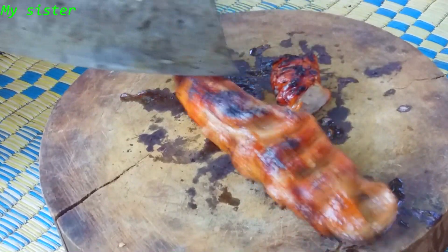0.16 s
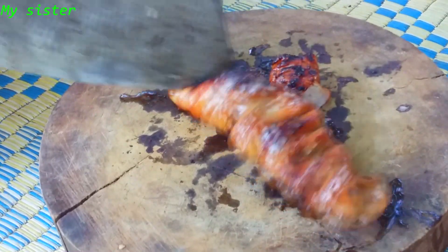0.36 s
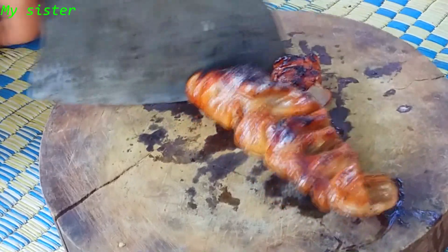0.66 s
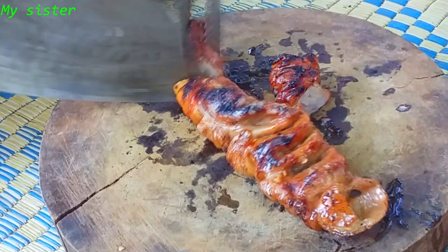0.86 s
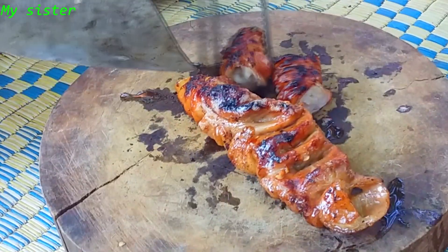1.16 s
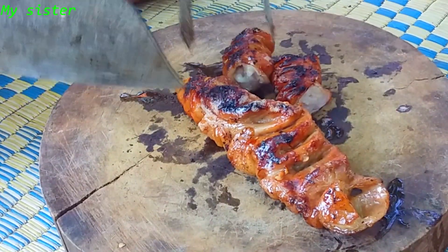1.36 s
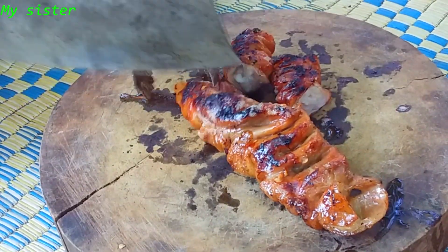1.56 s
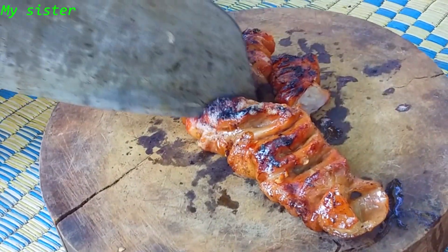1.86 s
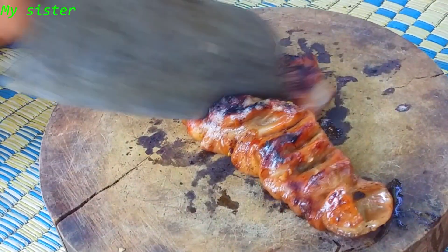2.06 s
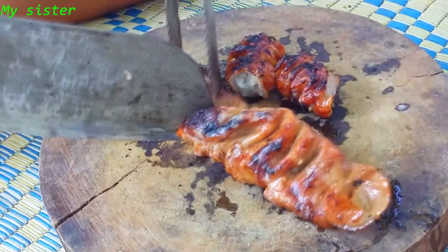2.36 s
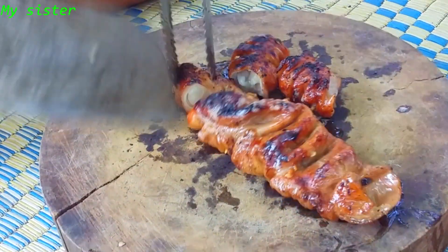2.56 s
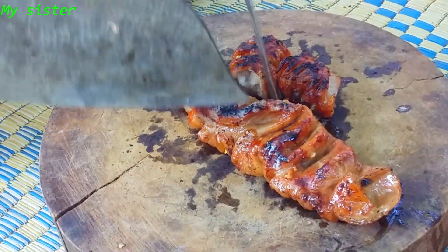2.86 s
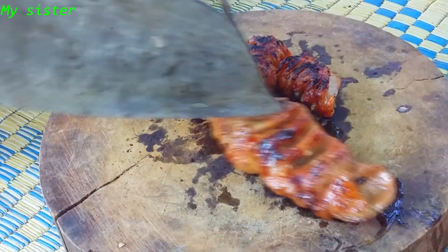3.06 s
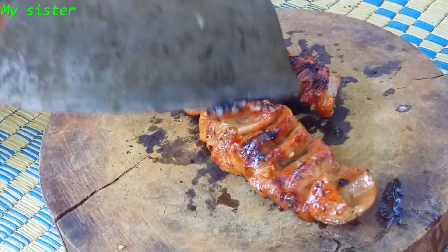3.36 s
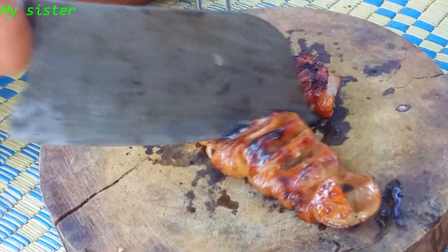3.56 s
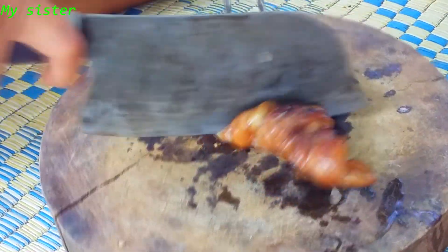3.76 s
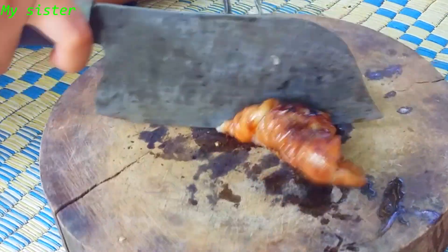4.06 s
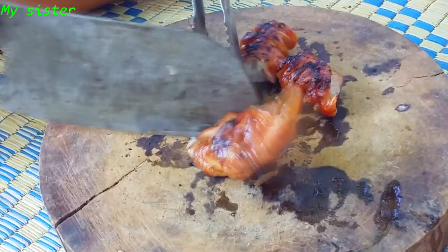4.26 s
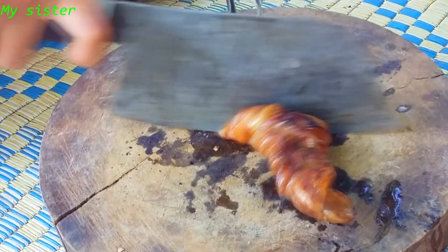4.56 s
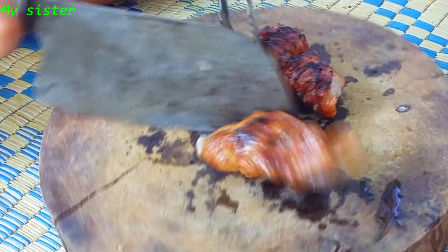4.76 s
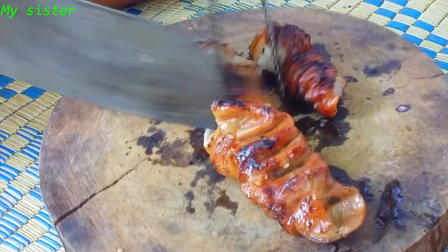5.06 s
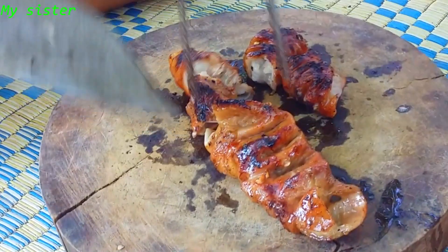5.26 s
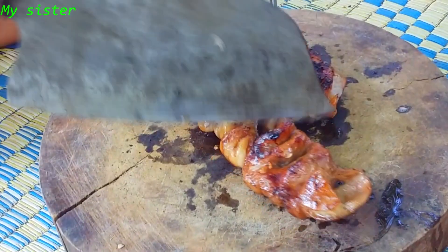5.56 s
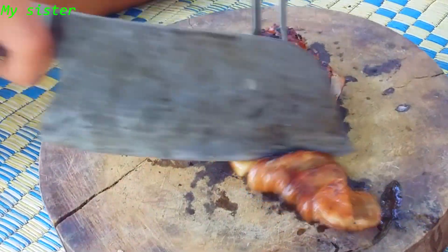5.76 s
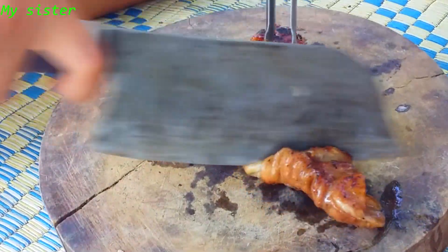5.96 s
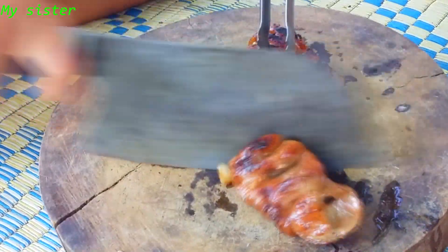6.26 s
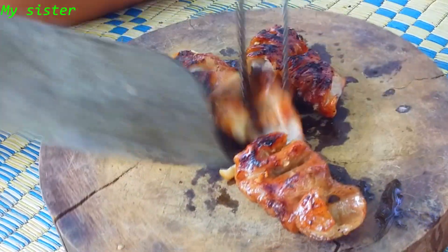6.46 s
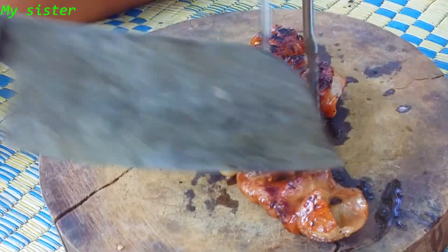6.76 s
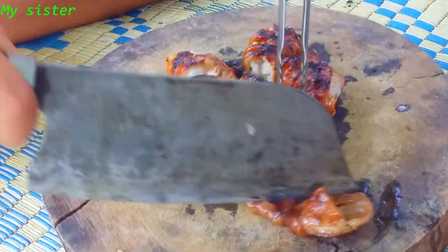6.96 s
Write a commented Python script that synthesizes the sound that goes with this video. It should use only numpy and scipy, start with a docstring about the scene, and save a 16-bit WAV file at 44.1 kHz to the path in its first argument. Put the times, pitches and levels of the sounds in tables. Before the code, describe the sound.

Very close to the microphone, a steel cleaver works through crusty grilled pork on a thick wooden block. Quiet scrapes and a soft wooden knock come first, then a pause, a light tong clink and small crackles. Sharp crust cracks lead into rapid rough sawing strokes with ringing blade edge, and finally a much louder harsh scraping burst. Low rumble and faint hiss lie beneath, with very little reverberation.

```python
"""Cleaver sawing grilled pork

A steel cleaver saws through grilled pork on a thick wooden block, close to one microphone. Slip jolts, shaped
by stroke forces, shake resonances of blade, edge and block and add unringing rasp. Crust snaps are short cracks
among splinter noise; tong clinks and block knocks are dying sines. Filtered noise gives a quiet rumble and
hiss, with a wavering band near 5 kHz. Both channels are the same."""
import sys
import numpy as np
from scipy import signal
from scipy.fft import rfft, irfft
from scipy.io import wavfile
from scipy.ndimage import uniform_filter1d

SR = 44100
rng = np.random.default_rng(int(sys.argv[2]) if len(sys.argv) > 2 else 0)


def file_out(sig):
    """Save sig as 16-bit WAV at sys.argv[1]."""
    # one column per channel
    cols = np.atleast_2d(sig).T
    # limit, then scale
    lim = np.clip(cols, -1, 1)
    pcm = np.round(lim * 32767).astype(np.int16)
    wavfile.write(sys.argv[1], SR, pcm)


N = 314433

# saw strokes: (full force at [s], rise [s], hold [s], release [s], blade drive [dB],
# then above the blade drive: edge [dB], block low modes [dB], block high modes [dB];
# modes favoured by the contact point: blade [Hz], edge [Hz])
SAW_STROKES = [ (0.142, 0.035, .002, 0.025, -77.5, 23, -7, -6, 2500, 5550),
               (0.179, 0.033, .1, 0.051, -74.5, 12, 8, 4, 2400, 5350),
               (0.432, .025, 0.14, .03, -79.5, 19, 8, -5, 2500, 5120),
               (0.591, 0.045, 0.023, .05, -66.5, 13, 0, -7, 2620, 5450),
               (0.641, 0.031, .002, 0.03, -59, 8, 1.5, -5, 2540, 5450),
               (0.774, 0.1, .18, .06, -71, 12, 8.5, -3, 2300, 5330),
               (2.161, 0.058, .002, 0.079, -61.5, 10, 2, -12, 2970, 4500),
               (2.303, 0.078, 0.036, .12, -65, 11.5, 1, -5, 2600, 5000),
               (2.476, .03, .002, .04, -79, 21, -3, -5, 2480, 5150),
               (2.53, 0.055, 0.085, .08, -77, 13, 9, 3, 2480, 5130),
               (2.715, 0.028, 0.1, 0.11, -70.5, 3, 0, -4, 2320, 4860),
               (3.401, 0.011, 0.02, 0.019, -63, 2.5, -6, 5, 2470, 4800),
               (3.513, .02, 0.034, 0.2, -70, -18, 0, 3.5, 2540, 4920),
               (3.663, 0.051, .015, .02, -72.5, 12, -2, 5, 2500, 5400),
               (3.701, 0.015, 0.017, 0.026, -43.5, 12.5, -36, -40, 3030, 4350),
               (3.744, 0.044, 0.026, 0.057, -47, 1.5, -10.5, -4, 2400, 4900),
               (3.852, 0.0062, .002, 0.023, -45, 2.5, -32, -34, 3020, 3900),
               (3.909, 0.05, .002, 0.016, -44, -3.5, -11, -0.5, 2400, 4730),
               (3.944, 0.02, .036, 0.031, -61, 5, -4, 0.5, 2370, 5000),
               (4.052, 0.028, 0.065, 0.033, -57, 2, -8, -1, 2340, 5000),
               (4.19, 0.016, 0.011, 0.039, -44, -7.5, -7.5, -1, 2320, 3970),
               (4.229, .02, 0.035, 0.022, -52, 0.5, -0.5, -5, 2200, 5400),
               (4.302, 0.024, 0.041, .03, -71, 3, -18, -11, 2270, 4880),
               (4.426, 0.018, .002, 0.043, -44, -5, -22, -4, 2330, 5000),
               (4.552, 0.2, .002, 0.029, -50.5, -1.5, -3, -3.5, 2320, 5420),
               (4.606, 0.017, .002, 0.24, -59, 0, 0.5, 2.5, 2390, 5100),
               (4.747, 0.018, 0.044, .04, -70, 14, 8.5, 2, 3040, 4920),
               (4.893, 0.036, .002, 0.042, -67, 20.5, 9, 4, 2440, 4760),
               (4.908, .02, 0.043, 0.02, -68, 10.5, 5.5, 4, 2450, 4300),
               (5.065, 0.06, 0.059, 0.074, -59, 6.5, 1, -13, 2370, 5050),
               (5.684, 0.007, .002, 0.053, -51, 13, -21, -6, 2460, 4600),
               (5.801, 0.074, .002, 0.061, -53, -2, -11, -6, 2540, 3850),
               (5.887, .01, 0.1, .03, -69, 4.5, 0, 3, 2260, 4900),
               (6.055, 0.031, 0.022, 0.03, -36, -4, -11.5, -6, 2440, 3880),
               (6.098, 0.014, 0.02, 0.018, -31, 1.5, -17, -12, 2370, 5800),
               (6.13, 0.033, 0.017, 0.045, -27.5, -1, -42, -1, 2840, 3900),
               (6.211, 0.067, .002, 0.042, -55, 9, 10, -3, 2200, 4560),
               (6.256, .008, .012, 0.033, -49.5, 5, -10, -9, 2570, 4430),
               (6.29, 0.035, 0.0023, 0.046, -34.5, 4.5, -13, -4, 2600, 4460),
               (6.314, 0.044, 0.0024, 0.024, -27, -4, -38, -17, 2640, 4370),
               (6.364, 0.098, 0.033, .06, -59, 9.5, 7, -12, 2080, 3920),
               (6.437, 0.098, 0.012, 0.1, -56.5, 8.5, 3.5, -11, 1990, 5100),
               (7.09, 0.0045, 0.011, .008, -52.5, 3.5, -21, -15, 2540, 4240), ]
# crust snaps: (time [s], level [dB], centre [Hz], block high-mode jolt above level [dB])
CRUST_SNAPS = [(0.1316, -50, 5600, -32), (0.19, -47, 5400, -20), (0.4339, -47, 5170, -31),
               (0.4918, -50, 5540, -16), (0.592, -39.5, 5070, -29), (0.643, -59, 5500, -28),
               (1.919, -53, 3720, -25), (1.927, -46.5, 5150, -34), (2.057, -50.5, 5270, -5),
               (2.064, -42, 4260, -27), (2.1634, -33, 4280, -16), (2.291, -44, 4200, -25),
               (2.3688, -52, 5070, -10), (3.3033, -49, 2420, 3.5), (3.6351, -50, 4900, -9),
               (3.6875, -44, 5800, -30), (3.702, -24, 4320, -27), (3.7185, -23, 4570, -26),
               (3.8525, -39, 3000, -27), (3.9014, -36.5, 2530, -1), (4.2064, -35.5, 2360, -25),
               (4.397, -51, 5270, -30), (4.4379, -41.5, 5160, -29), (4.559, -43.5, 5500, -9),
               (4.6049, -54.5, 1170, -19), (4.686, -52.5, 1360, -18), (4.785, -40.5, 5230, -35),
               (4.891, -33, 4900, -36), (5.685, -30, 5400, -40), (5.8074, -53, 2920, -19),
               (5.839, -48, 5200, -25), (5.8885, -47, 2400, -16), (6.2582, -50, 5270, -23),
               (6.2696, -56, 2540, -16), (6.9602, -44, 4000, -23), (6.9665, -43.5, 4500, -31),
               (7.0985, -43.5, 2620, -26)]
# knocks on the block: (time [s], level [dB])
BLOCK_KNOCKS = [(0.06, -45), (1.184, -43.5)]
# blade struck in the air: (frequency [Hz], relative level [dB], t60 [s])
FREE_BLADE_MODES = [(1480, -16, .08), (2056, -6, .08), (2525, -6, .16), (2875, -12, .07), (3900, -7, .09),
                    (4240, -6, .05), (5000, -2, .05), (5340, 0, .05), (5780, -1, .05), (6940, -7, .04),
                    (10790, 0, .045)]
# block when knocked: (frequency [Hz], relative level [dB], t60 before the fade [s])
KNOCKED_BLOCK_MODES = [(754, 7, 0.19), (850, -2, 0.089), (1790, -6, .07), (1887, 1.5, 0.055)]
# blade under the hand: (frequency [Hz], width [Hz], relative level [dB])
BLADE_MODES = [(1740, 380, -10), (2100, 120, -6), (2356, 220, -1.5), (2590, 110, -7.5), (2697, 220, 4.5),
               (2988, 210, 5), (3050, 300, 3.5)]
# thin edge under the hand: (frequency [Hz], width [Hz], relative level [dB])
EDGE_MODES = [(3535, 110, -12), (3380, 150, -7), (3770, 300, 12.5), (4200, 97, -14), (4140, 370, 13.5),
              (5000, 290, -27), (4680, 470, 15.5), (5270, 460, -19), (5143, 140, 13), (5414, 250, 12),
              (5700, 27, -10), (5800, 140, -16.5), (6580, 540, 3.5)]
# block while sawing, low: (frequency [Hz], width [Hz], relative level [dB])
BLOCK_LOW_MODES = [(739, 128, -5.5), (897, 175, -7), (1830, 1270, -6.5)]
# block while sawing, high: (frequency [Hz], width [Hz], relative level [dB])
BLOCK_HIGH_MODES = [(1011, 40, 4), (1116.5, 126, 17), (2246, 300, 4)]
# spectrum of the unringing part of the slips: (frequency [Hz], relative density [dB per Hz])
RASP_SPECTRUM = [(120, -52), (200, -38.5), (589, -12), (1130, -4), (1390, -0.5), (2660, -3), (3260, -2),
                 (5840, -11), (12000, -67), (15600, -83), (22000, -120)]
# spectrum of the surroundings: (frequency [Hz], relative density [dB per Hz])
AIR_SPECTRUM = [(12, -49), (20, -22), (26, -33), (55, -2.5), (93, -2), (122, -1), (253, -3), (406, -9),
                (454, -8), (887, -14), (1240, -14), (2630, -19), (5000, -18), (7590, -37), (15700, -31)]
# level following of blade, edge, block low, block high: (each [dB per dB of force]); the block follows the
# force less steeply
FORCE_FOLLOW = [1.008, 0.99, 0.85, 0.85]
# level change during the hold, as the edge sinks into the meat and dulls:
# (blade [dB/s], edge [dB/s], block low [dB/s], block high [dB/s])
HOLD_SLOPES = [10, -49, -5, -5]
# tongs touching the blade: (time [s], level [dB])
TONG_CLINKS = [(1.7398, -36.5), (5.684, -38)]

AIR_DB, HISS_BAND_DB = -67.5, -74
BAND_LIMIT_HZ = 15750
RAMP_DB = 25  # force gained in one rise time, lost in one release time


def gain_of(db):
    """dB to gain."""
    return 10 ** (np.asarray(db) / 20)


def evened(x):
    """Scales to rms 1."""
    return x / np.sqrt(np.mean(x ** 2) + 1e-20)


def coloured(x, spectrum):
    """Shapes x by (Hz, dB) points on a log-frequency axis, keeping the power of white input."""
    point_hz, point_db = np.transpose(spectrum)
    hz = np.fft.rfftfreq(len(x), 1 / SR)
    shape_db = np.interp(np.log(hz + 1), np.log(point_hz + 1), point_db)
    return irfft(rfft(x) * evened(gain_of(shape_db)), len(x))


def resonate(x, hz, width_hz):
    """One mode with steep skirts: two peaks in series; white input of rms 1 leaves near rms 1."""
    widths_hz = (width_hz, min(2.6 * width_hz, hz))
    stages = [np.concatenate(signal.iirpeak(hz, hz / w, SR)) for w in widths_hz]
    return signal.sosfilt(stages, x) / np.sqrt(np.pi * width_hz / SR)


def drift(rate_hz):
    """Slow random curve of rms 1: averaged random steps, interpolated."""
    steps_per_s = 60
    steps = rng.standard_normal(round(N / SR * steps_per_s) + 2)
    steps = evened(uniform_filter1d(steps, max(1, round(steps_per_s / rate_hz))))
    return np.interp(np.arange(N), np.linspace(0, N, len(steps)), steps)


def add(mix, start_s, sound):
    """Mixes a sound in place from start_s, cut at the end of the mix."""
    part = mix[round(start_s * SR):][:len(sound)]
    part += sound[:len(part)]


def ring(modes, rise_s):
    """Exponentially dying sines with a soft start, peak 1."""
    t = np.arange(SR // 4) / SR
    hz, level_db, t60_s = np.transpose(modes)[:, :, None]
    sines = gain_of(level_db - 60 * t / t60_s) * np.sin(2 * np.pi * hz * t)
    sound = sines.sum(0) * (1 - np.exp(-t / rise_s))
    return sound / abs(sound).max()


def background():
    """Rumble and hiss: slightly swelling coloured noise plus a wavering band near 5 kHz."""
    air_gain = gain_of(AIR_DB + 0.13 * drift(3.))
    air = air_gain * coloured(rng.standard_normal(N), AIR_SPECTRUM)
    waver_db = 1.2 * drift(3.) + 1.8 * drift(30.)
    hiss_band = resonate(rng.standard_normal(N), 5180, 760)
    return air + gain_of(HISS_BAND_DB + waver_db) * hiss_band


def knocks():
    """Knocked block: soft-started modes, dull, held about 12 ms then faded out fast."""
    out, t = np.zeros(N), np.arange(1400) / SR
    for time_s, level_db in BLOCK_KNOCKS:
        fade = np.exp(-(t / 0.012) ** 4)
        add(out, time_s, gain_of(level_db) * ring(KNOCKED_BLOCK_MODES, .001)[:len(t)] * fade)
    return out


def stroke_force():
    """Strokes rise, hold and let go; the strongest at a moment dominates the favoured modes."""
    force, contact = np.zeros((4, N)), np.zeros((2, N))
    for full_s, rise_s, hold_s, release_s, blade_db, *above_db, blade_hz, edge_hz in SAW_STROKES:
        rise_s, hold_s, release_s = max(rise_s, .003), max(hold_s, 0), max(release_s, .003)
        t = np.arange(-2 * rise_s, hold_s + 2 * release_s, 1 / SR)
        start_s = full_s + t[0]
        held_s = np.clip(t, 0, hold_s)
        ramp_db = RAMP_DB * np.minimum(np.minimum(t / rise_s, (hold_s - t) / release_s), 0)
        for line, db, follow, slope in zip(force, [0, *above_db], FORCE_FOLLOW, HOLD_SLOPES):
            add(line, start_s, gain_of(blade_db + db + follow * ramp_db + slope * held_s))
        weight = gain_of(blade_db + ramp_db + HOLD_SLOPES[0] * held_s)
        for line, hz in zip(contact, (blade_hz, edge_hz)):
            add(line, start_s, hz * weight)
    # force-weighted mean of the favoured modes, with defaults at rest
    rest = gain_of(-120)
    favoured_hz = (contact + rest * np.array([[2450], [5000]])) / (force[0] + rest)
    return force, favoured_hz


def slips(per_s, spread_db):
    """Stick-slip of the edge: dense tiny jolts of random sign, a few large; rms 1."""
    size = gain_of(spread_db * np.minimum(rng.exponential(1, N), 4))
    sign = rng.choice([-1., 1.], N)
    return evened(size * sign * (rng.random(N) < per_s / SR))


def shaken(drive, modes, wander_db, favoured_hz=None, fall_db_per_octave=0):
    """Modes far from the favoured one are driven less; each wavers as the contact slides."""
    levels = []
    for hz, _, level_db in modes:
        octaves = np.minimum(abs(np.log2(hz / favoured_hz)), .45) if fall_db_per_octave else 0
        levels.append(gain_of(level_db - fall_db_per_octave * octaves))
    drive = drive / np.sqrt(sum(level ** 2 for level in levels))
    return sum(resonate(drive * level * gain_of(wander_db * drift(25.)), hz, width_hz)
               for (hz, width_hz, _), level in zip(modes, levels))


def sawing(snap_jolts):
    """One train of slips drives blade, edge and block; returns the ringing and unringing parts."""
    force, (blade_hz, edge_hz) = stroke_force()
    force = uniform_filter1d(force, 90, axis=1)
    jolts = gain_of(3.3 * drift(60.)) * slips(6000, 2.9)
    blade, edge, low, high = force * jolts
    edge_jolts, block_jolts = snap_jolts

    # in gentle strokes the meat damps the blade to one broad mode
    buried = 1 / (1 + (force[0] / gain_of(-66)) ** 2)
    free_blade = blade * np.sqrt(1 - buried)
    ringing = gain_of(-4.0) * shaken(free_blade, BLADE_MODES, 3.5, blade_hz, 61.0)
    ringing += gain_of(-2.0) * resonate(blade * np.sqrt(buried), 2840, 910)
    ringing += gain_of(-0.5) * shaken(edge + edge_jolts, EDGE_MODES, 3.5, edge_hz, 18)
    ringing += gain_of(-6.0) * shaken(low, BLOCK_LOW_MODES, 3.5)
    ringing += gain_of(-7.5) * shaken(high + block_jolts, BLOCK_HIGH_MODES, 0.78)

    # the block rocks under the hand; load grows slower than the ringing
    edge_and_blade_force = force[0] + force[1]
    load = abs(uniform_filter1d(edge_and_blade_force, 1500)) ** 0.5 * jolts
    push = gain_of(-43.5) * resonate(load, 134, 150) + gain_of(-43) * resonate(load, 277, 390)
    # the finest splinters
    splinters = abs(uniform_filter1d(edge_and_blade_force, 200)) ** 0.59 * jolts
    fizz = gain_of(-49.5) * resonate(splinters, 11500, 7000)
    rasp = gain_of(-14.5) * coloured(edge + blade, RASP_SPECTRUM)
    return ringing, rasp + push + fizz


def crust():
    """Splinter noise builds up, the crust cracks in a cycle or two; it jolts edge and block."""
    out, jolts, t = np.zeros(N), np.zeros((2, N)), np.arange(1200) / SR
    crack_cycles, lead_s = 1.2, .008
    for time_s, level_db, hz, block_db in CRUST_SNAPS:
        crack = np.sin(2 * np.pi * hz * t) * t * np.exp(-t * hz / crack_cycles)
        add(out, time_s, gain_of(level_db) * crack / crack.max())
        swell = np.where(t < lead_s, np.exp((t - lead_s) / 0.00098), np.exp((lead_s - t) / 0.0084))
        splinters = resonate(rng.standard_normal(len(t)), hz, 0.38 * hz) * swell
        add(out, time_s - lead_s, gain_of(level_db - 14.5) * splinters)
        add(jolts[0], time_s, gain_of([level_db + 9.0]))
        add(jolts[1], time_s, gain_of([level_db + block_db + 18.5]))
    return out, jolts


def clinks():
    """Tongs on the blade: free blade modes ring, with a short noisy rattle of contact."""
    out, t = np.zeros(N), np.arange(1400) / SR
    for time_s, level_db in TONG_CLINKS:
        add(out, time_s, gain_of(level_db) * ring(FREE_BLADE_MODES, 0.00017))
        rattle = resonate(rng.standard_normal(len(t)), 5140, 1200) * np.exp(-t / 0.0072)
        add(out, time_s, gain_of(level_db - 5) * rattle)
    return out


def nearby_reflections(near):
    """Short tail from nearby surfaces: noise decaying 60 dB in 0.11 s, starting after 3 ms."""
    t = np.arange(SR // 4) / SR
    tail = rng.standard_normal(len(t)) * gain_of(-60 * t / 0.11) * (t > .003)
    return gain_of(-14) * signal.oaconvolve(near, tail / np.linalg.norm(tail))[:N]


def scene():
    """Mixes all layers; ringing, snaps and blows are dulled on top, the rasp is not."""
    air = background()
    snaps, snap_jolts = crust()
    ringing, rasp = sawing(snap_jolts)
    bright = ringing + snaps + knocks() + clinks()
    dulled = signal.sosfilt(signal.butter(6, 7000, fs=SR, output="sos"), bright)
    near = dulled + gain_of(-17.5) * bright + rasp
    mono = near + nearby_reflections(near) + air
    return np.array([mono, mono])


def record(dry):
    """Band limit: linear-phase low-pass."""
    lowpass = signal.firwin(511, BAND_LIMIT_HZ, window=("kaiser", 9), fs=SR)
    return signal.oaconvolve(dry, lowpass[None], "same")


dry = scene()
out = record(dry)
file_out(out)
```